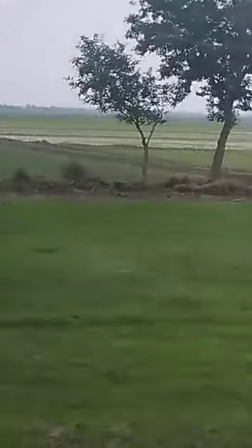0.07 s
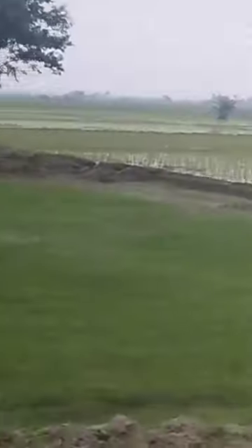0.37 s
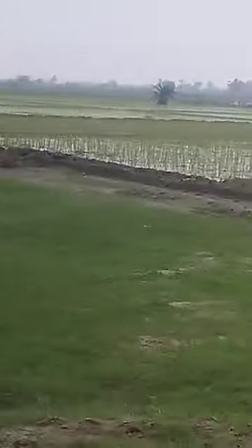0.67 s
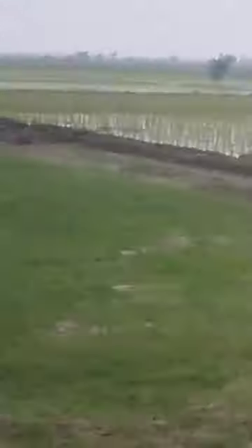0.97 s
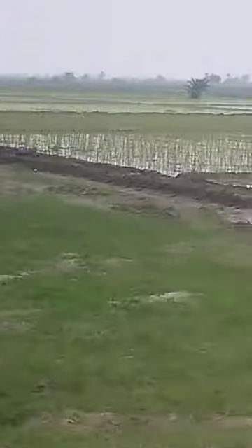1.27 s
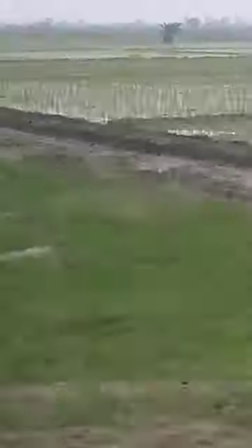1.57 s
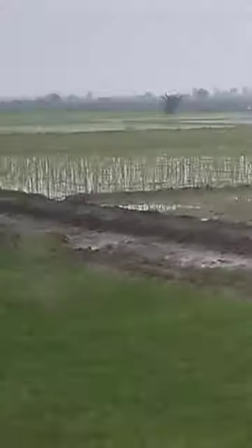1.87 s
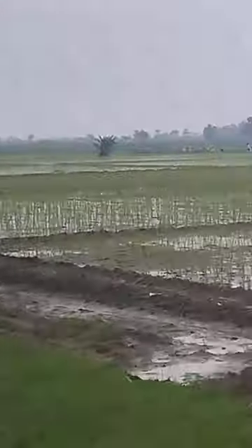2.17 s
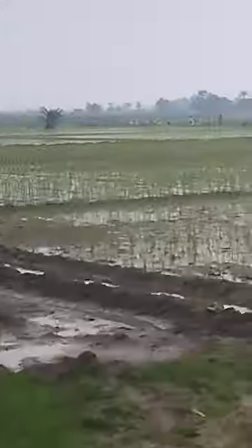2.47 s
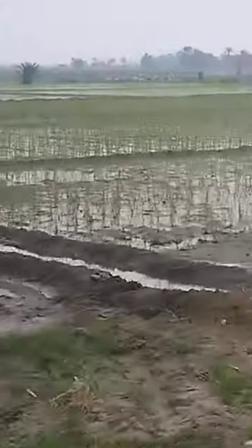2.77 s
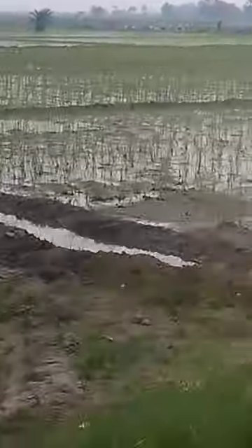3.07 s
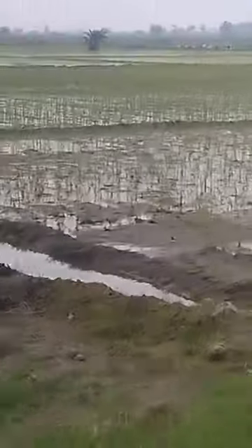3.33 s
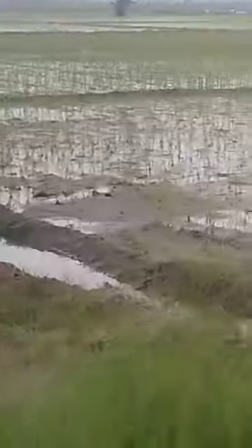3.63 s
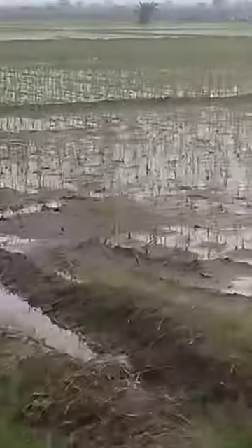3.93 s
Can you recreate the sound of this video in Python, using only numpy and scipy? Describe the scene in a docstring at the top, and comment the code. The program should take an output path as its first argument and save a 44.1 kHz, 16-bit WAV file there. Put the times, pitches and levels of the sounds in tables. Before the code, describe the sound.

Wind buffets the microphone for all four seconds, a deep uneven rumble with dull pops, mostly on the left. Gusts hit both sides from about 1.8 to 2.9 seconds, and a deep swell peaks near 3.6. Underneath, on the right, the vehicle's slow engine thuds and its tyres rush softly. Faint bodywork squeaks come around 1 second and after 3, with a tiny crackle and hiss near 2.5.

```python
"""Wind buffets the microphone, mostly its left port, on an open vehicle riding past wet fields.
Turbulence rumbles with the gusts; single eddies hit the ports as dull pops.
To the right, a slow engine thuds as each firing rings the exhaust, and tyres and running gear rush.
The bodywork squeaks faintly on the bumps.
A brief microphone overload crackle sounds on the left, then a short high hiss on the right."""
import sys
import numpy as np
from scipy import signal
from scipy.io import wavfile

SR = 44100
rng = np.random.default_rng(int(sys.argv[2]) if len(sys.argv) > 2 else 0)


def to_wav(s):
    """Save 16-bit WAV."""
    ch = np.atleast_2d(s).T  # columns
    pcm = np.round(np.clip(ch, -1, 1) * 32767)  # PCM
    wavfile.write(sys.argv[1], SR, pcm.astype(np.int16))


N = 176400
TIME = np.arange(N) / SR


def wind(gust_db):
    """Turbulence at each port: the bass heaves with the swell, the low mids follow the gusts most."""
    # Spectrum at the reference gust. Each row: frequency in Hz, relative density in dB.
    colour = [(22, 0), (45, -2), (130, -5), (250, -11.5), (400, -19.5), (600, -32), (850, -46), (1200, -53),
              (1900, -63.5), (3400, -71.5), (7000, -86.5)]
    # Response to gusts. Each row: frequency in Hz, band dB per gust dB.
    gust_slope = [(30, 0.06), (120, .5), (300, 0.8041), (700, 1.66), (2000, -0.16)]
    # Deep pressure swell. Each row: time in seconds, left level in dB, right level in dB.
    swell = [(0, -4, -14), (.45, -3.5, -3), (.83, 6, -8.5), (1.1, 0, -4.5), (1.42, 3, -10),
             (1.52, 5.5, -12.5), (1.75, -3.5, -9), (2, 1, -1.5), (2.37, 6, 1), (2.55, -1.5, -8),
             (2.87, 7, -2), (3.1, 1, -22), (3.2, -1, -19), (3.31, 1.5, -16.5), (3.48, -1.5, -20),
             (3.64, 14, -10), (3.75, 0.5, -6.5), (4, 5, -16)]
    # Response to the swell. Each row: frequency in Hz, band dB per swell dB.
    swell_slope = [(60, 0.59), (150, 0.35), (350, 0.36)]
    rms_db = -12.5
    out, swell_db = 0, in_time(swell)
    for hz, noise in noise_bands(np.geomspace(12, 8000, 17)):
        drive_db = at_hz(gust_slope, hz) * gust_db + at_hz(swell_slope, hz) * swell_db
        out = out + noise * from_db(at_hz(colour, hz) + drive_db)
    return from_db(rms_db) * unit_rms(out)


def gusts():
    """Air strength per port in dB re the reference gust: flow plus buffets, broken up by eddies."""
    # Flow between gusts. Each row: time in seconds, left level in dB, right level in dB.
    airflow = [(0, -29.5, -52.5), (.45, -29, -57.5), (.85, -28, -58.5), (1.45, -31, -39.5),
               (1.77, -19.5, -44), (2.1, -24.5, -48.5), (2.29, -32, -45), (2.85, -28.5, -42),
               (3.1, -28.5, -63.5), (3.22, -32, -57), (3.48, -39.5, -52), (3.72, -26, -39), (3.9, -35, -53),
               (4, -25.5, -40.5)]
    # Gusts. Each row: centre in seconds, length in seconds, level in dB, port (0 left, 1 right).
    buffets = [(0.078, 0.076, -17.5, 0), (0.164, 0.031, -18, 0), (0.256, 0.043, -8.5, 0),
               (0.364, .023, -17, 0), (0.429, 0.065, -16.5, 0), (0.485, .06, -19.5, 0),
               (0.602, 0.03, -18, 0), (0.662, 0.0074, -17.5, 0), (0.805, 0.02, -14, 0),
               (0.896, 0.019, -19, 0), (0.94, 0.01, -17.5, 0), (1.121, 0.054, -13.5, 0),
               (1.123, 0.014, -19.5, 1), (1.216, 0.041, -21.5, 0), (1.37, .014, -16.5, 0),
               (1.611, 0.012, -15.5, 1), (1.824, .03, -14.5, 1), (1.888, 0.027, -12, 0),
               (1.935, 0.014, -8, 1), (1.998, .02, -15, 1), (2.053, 0.028, -11.5, 0),
               (2.151, 0.026, -13.5, 1), (2.254, 0.054, -19.5, 1), (2.347, 0.035, -13, 0),
               (2.4, 0.023, -16.5, 0), (2.42, .013, -8.5, 1), (2.496, 0.064, -18.5, 0),
               (2.498, 0.031, -18, 1), (2.556, 0.025, -13.5, 1), (2.649, 0.046, -16, 0),
               (2.67, 0.014, -10, 1), (2.79, .046, -18, 0), (2.854, 0.018, -12.5, 1),
               (2.96, 0.071, -18.5, 0), (3.075, .05, -21, 0), (3.341, 0.032, -13, 0),
               (3.756, 0.019, -18, 0)]
    eddy_hz, eddy_db, reference_db = 61.15, 4, -17.5
    power = from_db(in_time(airflow)) ** 2
    for centre_s, length_s, db, port in buffets:
        power[int(port)] += from_db(db) ** 2 * np.exp(-(2 * (TIME - centre_s) / length_s) ** 2)
    churn_db = np.array([eddy_db * drift(eddy_hz) for _ in range(2)])
    return 10 * np.log10(power) + churn_db - reference_db


def lulls():
    """Wind gain per port in dB: the flow briefly lets go of the left one."""
    # Each row: centre in seconds, length in seconds.
    dips = [(0.121, 0.01), (0.326, 0.021), (0.563, 0.051), (0.747, 0.057), (1.598, 0.043), (2.299, 0.021),
            (3.151, 0.055), (3.403, 0.023), (3.936, 0.067)]
    depth_db = -12
    dip = sum(np.exp(-(2 * (TIME - centre_s) / length_s) ** 4) for centre_s, length_s in dips)
    return np.array([depth_db * dip, np.zeros(N)])


def eddy_pulse(hz, decay_cycles=0.32):
    """Pressure of one eddy: a pointed crest with suction on either side."""
    t = np.arange(-(SR // 10), SR // 10 + 1) / SR
    return np.cos(2 * np.pi * hz * t) * np.exp(-np.abs(t) * hz / decay_cycles)


def slaps(gust_db):
    """Eddies pop on a port: many small ones in the gusts, and hard ones, lower the bigger they are."""
    # Each row: centre in seconds, relative level in dB, frequency in Hz, port (0 left, 1 right).
    hard_slaps = [(0.153, -5, 295, 0), (0.205, -3, 483, 0), (.234, -6.5, 420, 0), (.302, -5, 370, 0),
                  (.348, -5.5, 473, 0), (.43, -11, 418, 0), (0.617, -3, 245, 0), (0.663, -6.5, 510, 0),
                  (.705, -10.5, 460, 0), (.85, -0.5, 390, 0), (.903, -3.5, 264, 0), (.949, -5, 323, 0),
                  (1.1, -2, 360, 0), (1.135, -9, 220, 0), (1.162, -3.5, 316, 0), (1.222, -1, 302, 0),
                  (1.518, 2.5, 110, 0), (1.546, -0.5, 253, 0), (1.713, -4, 109, 0), (1.78, -4.5, 330, 0),
                  (1.821, -5.5, 327, 1), (1.843, 3, 220, 1), (1.885, -1.5, 420, 0), (1.908, -2.5, 288, 0),
                  (1.932, -4.5, 310, 1), (1.984, -7, 90, 1), (2.097, -9, 380, 0), (2.153, -4.5, 150, 1),
                  (2.255, -0.5, 128, 1), (2.332, -2, 378, 0), (2.384, 0, 110, 0), (2.413, 2.5, 283, 1),
                  (2.483, -2, 300, 0), (2.547, -2.5, 485, 1), (2.627, -5, 377, 0), (2.673, -3, 265, 1),
                  (2.736, -4, 232, 1), (2.759, -7, 250, 0), (2.78, -4.5, 382, 0), (2.827, -3.5, 300, 0),
                  (2.847, -1.5, 190, 1), (2.862, -3, 290, 1), (3.113, -1, 250, 0), (3.184, -13, 330, 0),
                  (3.22, -4.5, 170, 0), (3.325, -1, 261, 0), (3.451, -2.5, 99, 0), (3.68, -2.5, 236, 0),
                  (3.705, -11, 133, 0), (3.731, -12.5, 352, 0), (3.766, -4, 152, 0), (3.884, -1, 85.6, 0),
                  (3.988, -7, 150, 0)]
    reference_per_s, small_db, small_hz = 40, -6, 290
    hard_gain_db, lowpass_hz = 3, 1010
    hits = rng.random((2, N)) < reference_per_s * from_db(gust_db) ** 2 / SR
    clicks = hits * (2 * rng.random((2, N)) - 1) * from_db(small_db)
    out = signal.fftconvolve(clicks, eddy_pulse(small_hz)[None], "same", axes=1)
    for centre_s, db, hz, port in hard_slaps:
        pulse = from_db(db + hard_gain_db) * eddy_pulse(hz)
        start = int(centre_s * SR) - len(pulse) // 2
        out[int(port), start:start + len(pulse)] += pulse[:N - start]
    return signal.sosfilt(signal.butter(4, lowpass_hz, fs=SR, output="sos"), out)


def engine():
    """One soft pressure pulse per firing rings the exhaust."""
    # Speed and strength. Each row: time in seconds, firings per second, relative level in dB.
    running = [(0, 17.75, 0), (.7, 18.1, 0), (1.35, 18.1, -2), (2.6, 17.6, -3), (3.1, 16.2, -6),
               (3.5, 15.8, -5), (3.85, 18.5, -4)]
    # Exhaust resonances. Each row: frequency in Hz, gain in dB, T60 in seconds.
    modes = [(35.7, -15.5, 0.034), (102, -13, 0.035), (145.6, -17.5, 0.05), (220, -47.5, 0.026),
             (368, -30.5, 0.13), (527.4, -30, 0.11)]
    first_s, jitter_s, gain_db, spread_db = 0.006, 0.00045, 4, 1.2
    rate_hz, level_db = in_time(running)
    cycles = np.cumsum(rate_hz) / SR
    firing_s = np.interp(np.arange(int(cycles[-1]) + 1), cycles, TIME) + first_s
    late_s, uneven_db = (rng.standard_normal((len(firing_s), 2)) * [jitter_s, spread_db]).T
    at = np.clip(((firing_s + late_s) * SR).astype(int), 0, N - 1)
    clicks = np.zeros(N)
    clicks[at] = -from_db(gain_db + level_db[at] + uneven_db)
    pulses = bandpass(clicks, 54, 394, order=1)
    exhaust = sum(from_db(db) * ring(pulses, hz, t60_s) for hz, db, t60_s in modes)
    return from_right(exhaust, left_db=-4)


def rush():
    """Broad, slightly patchy noise of tyres and running gear; its level jostles a little."""
    # Each row: time in seconds, relative level below the split in dB, above it in dB.
    levels = [(0, -49.5, -51), (1.48, -50.5, -51.5), (1.61, -51.5, -55.5), (1.7, -50.5, -50),
              (1.85, -56, -57), (1.98, -60.5, -59), (2.12, -49.5, -53), (2.29, -58.5, -59),
              (2.33, -54, -52.5), (2.46, -60.5, -64.5), (2.64, -60, -60.5), (2.66, -55.5, -50),
              (2.75, -61.5, -63.5), (3.02, -55, -56.5), (4, -54, -55)]
    # Spectrum. Each row: frequency in Hz, relative density in dB.
    colour = [(60, 23.5), (200, 23.5), (400, 6.5), (800, 5.5), (1200, 3), (2050, -2), (2270, -10.5),
              (3000, -6), (3800, -6.5), (4300, -15.5), (5200, -7.5), (6400, -15.5), (7300, -21.5),
              (8300, -29.5), (11000, -35), (13500, -34), (15500, -15.5)]
    split_hz, patchy_db, coherence = 2200, 2.5, 0.52
    rms_db, left_db = -32, -14
    jostle_db = 0.8 * drift(hz=50)
    lower_db, treble_db = [curve - curve.mean() + jostle_db for curve in in_time(levels)]
    edges_hz = np.r_[50, 100, 200, 300, 450, np.geomspace(640, 8000, 24), 10000, 12500, 16000]
    out = 0
    for hz, noise in noise_bands(edges_hz):
        level_db = treble_db if hz > split_hz else lower_db
        out = out + from_db(at_hz(colour, hz) + level_db + patchy_db * drift(hz=25)) * noise
    right, unrelated = out
    left = coherence * delay_left(right) + np.sqrt(1 - coherence ** 2) * unrelated
    return from_db(rms_db) * unit_rms(np.array([from_db(left_db) * left, right]))


def squeaks():
    """Bodywork chirps: a rough tone and its octave arch and slide in pitch over rubbing noise."""
    # Each row: time in seconds, relative level in dB, pitch in Hz.
    chirps = [(0.9727, -50.5, 3790), (1.031, -54, 4010), (1.0894, -50, 4330), (1.2635, -47.5, 3630),
              (2.18, -50.5, 3580), (2.3366, -56.5, 4000), (2.505, -63, 4520), (2.656, -69, 3230),
              (2.9911, -52, 3750), (3.0634, -53.5, 3900), (3.1313, -47.5, 3230), (3.1894, -61, 3850),
              (3.2915, -48.5, 3960), (3.5274, -50.5, 3800), (3.6522, -50, 3860), (3.75, -47.5, 3700)]
    length_s, gain_db, octave_db, rub_db = 0.043, 7, -14.5, -9.5
    arch_depth, glide_spread, wobble_spread = 0.037, 0.035, 0.018  # fractions of the pitch
    wobble = wobble_spread * drift(hz=300)
    rub = unit_rms(bandpass(rng.standard_normal(N), 2800, 6800, order=6))
    out = np.zeros(N)
    for time_s, db, hz in chirps:
        at = np.flatnonzero(np.abs(TIME - time_s - length_s / 4) < length_s / 2)
        turn = np.linspace(0, np.pi, len(at))
        arch = np.sin(turn)
        glide = glide_spread * rng.standard_normal() * np.cos(turn)
        pitch_hz = hz * (1 + arch_depth * (arch - 1) + glide + wobble[at])
        phase = 2 * np.pi * np.cumsum(pitch_hz) / SR
        tone = np.sin(phase) + from_db(octave_db) * np.sin(2 * phase)
        out[at] += from_db(db + gain_db) * arch ** 2 * (tone + from_db(rub_db) * rub[at])
    return from_right(out, left_db=-13)


def crackle_and_hiss():
    """Overload crackle left, then a short high hiss right: fast-dying noise bursts an octave wide."""
    # Each row: start in seconds, peak before panning in dB, centre in Hz, left minus right in dB.
    bursts = [(2.352, -40.5, 2030, 15), (2.585, -40, 4050, -19)]
    t60_s = 0.026
    out, age_s = np.zeros((2, N)), TIME[:SR // 10]
    decay = from_db(-60 * age_s / t60_s)
    for start_s, db, hz, pan_db in bursts:
        noise = decay * rng.standard_normal(len(age_s))
        burst = bandpass(noise, hz / np.sqrt(2), hz * np.sqrt(2), order=4)
        burst *= from_db(db) / np.abs(burst).max()
        pan = np.array([from_db(pan_db), 1])
        start = int(start_s * SR)
        out[:, start:start + len(burst)] += np.outer(pan / pan.mean(), burst)
    return out


def delay_left(x, lag_s=0.00045):
    """Sound from the right reaches the left port later."""
    return np.interp(TIME - lag_s, TIME, x)


def from_right(x, left_db):
    """Source on the right: weaker and later at the left port."""
    return np.array([from_db(left_db) * delay_left(x), x])


def from_db(db):
    """Decibels to gain."""
    return 10 ** (np.asarray(db) / 20)


def unit_rms(x):
    """Scale to an rms of 1."""
    return x / np.sqrt(np.mean(x ** 2) + 1e-20)


def in_time(rows):
    """Interpolate each value column at every sample."""
    time_s, *columns = np.transpose(rows)
    return np.array([np.interp(TIME, time_s, column) for column in columns])


def at_hz(rows, hz):
    """Interpolate on a log-frequency axis."""
    points_hz, values = np.transpose(rows)
    return np.interp(np.log(hz), np.log(points_hz), values)


def drift(hz):
    """Smooth random curve of unit rms, low-passed at hz."""
    step, run_in = 20, 3000  # samples
    lowpass = signal.butter(3, hz, fs=SR / step, output="sos")
    slow = signal.sosfilt(lowpass, rng.standard_normal(N // step + run_in + 2))[run_in:]
    return np.interp(np.arange(N) / step, np.arange(len(slow)), unit_rms(slow))


def bandpass(x, low_hz, high_hz, order):
    """Band-pass with a flat top."""
    return signal.sosfilt(signal.butter(order, [low_hz, high_hz], "band", fs=SR, output="sos"), x)


def ring(x, hz, t60_s):
    """Resonator: a unit click starts a decaying sine of height 1."""
    radius, angle = from_db(-60 / (t60_s * SR)), 2 * np.pi * hz / SR
    return signal.lfilter([0, np.sin(angle)], [1, -2 * radius * np.cos(angle), radius ** 2], x + 1e-18)


def noise_bands(edges_hz):
    """Yield centre in Hz and two unrelated noises per band, at equal power per Hz."""
    white = rng.standard_normal((2, 2, N + SR // 2))
    for k, (low_hz, high_hz) in enumerate(zip(edges_hz, edges_hz[1:])):
        yield np.sqrt(low_hz * high_hz), bandpass(white[k % 2], low_hz, high_hz, order=3)[:, -N:]


def scene():
    """Wind over the vehicle's own sounds."""
    gust_db = gusts()
    air = wind(gust_db) * from_db(lulls()) + slaps(gust_db)
    return air + engine() + rush() + squeaks() + crackle_and_hiss()


def record(dry):
    """The microphone rounds off the peaks; the ends fade and the top is cut steeply."""
    ceiling, fade_s, cutoff_hz = 0.95, 0.003, 15650
    fade = np.clip(np.minimum(TIME, TIME[::-1]) / fade_s, 0, 1)
    rounded = ceiling * np.tanh(dry / ceiling)
    return signal.sosfilt(signal.ellip(10, 0.1, 80, cutoff_hz, fs=SR, output="sos"), rounded * fade)


dry = scene()
out = record(dry)
to_wav(out)
```